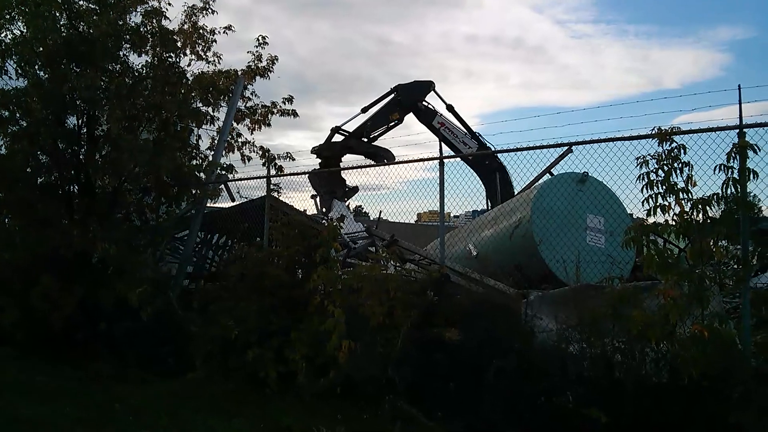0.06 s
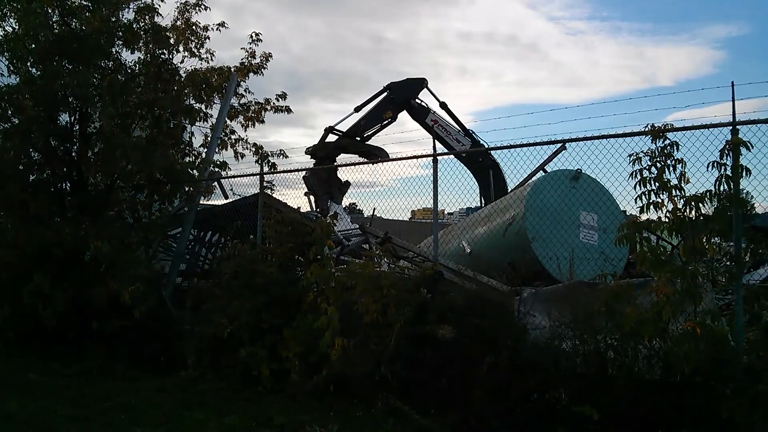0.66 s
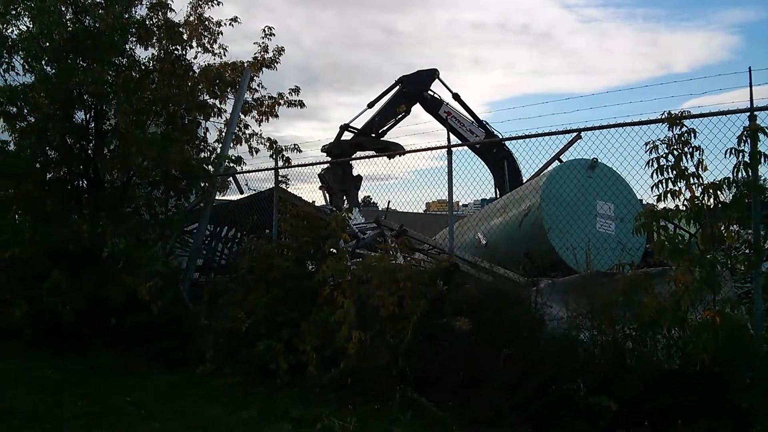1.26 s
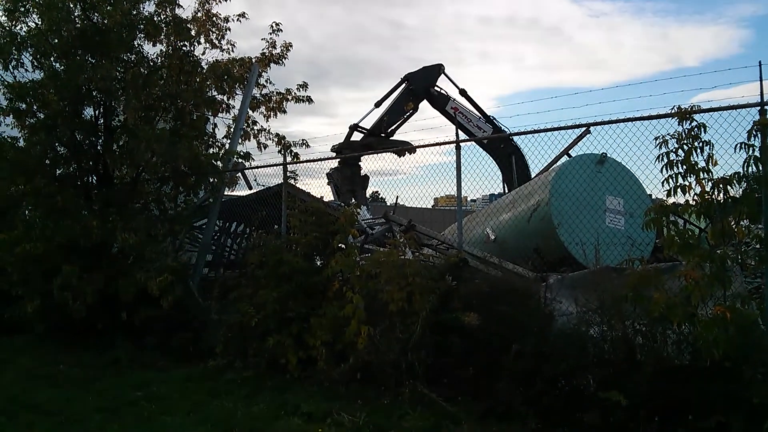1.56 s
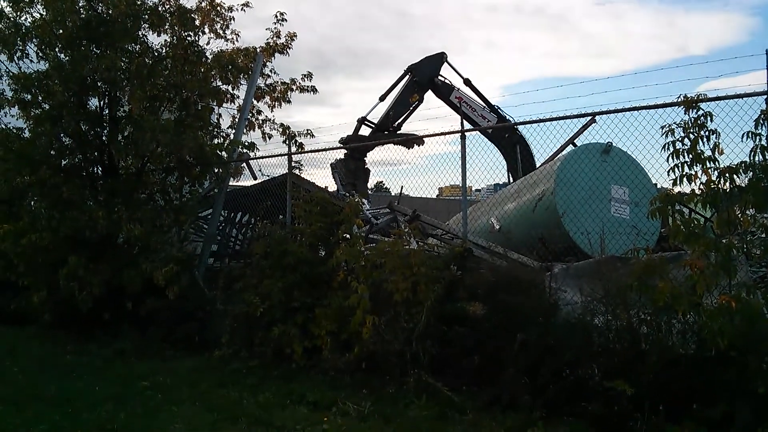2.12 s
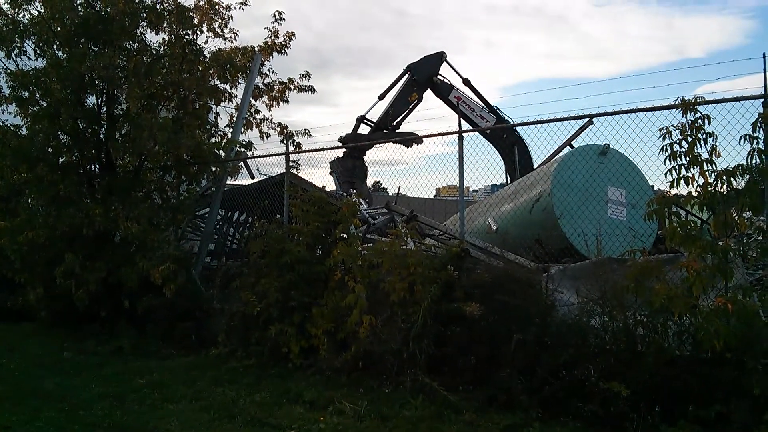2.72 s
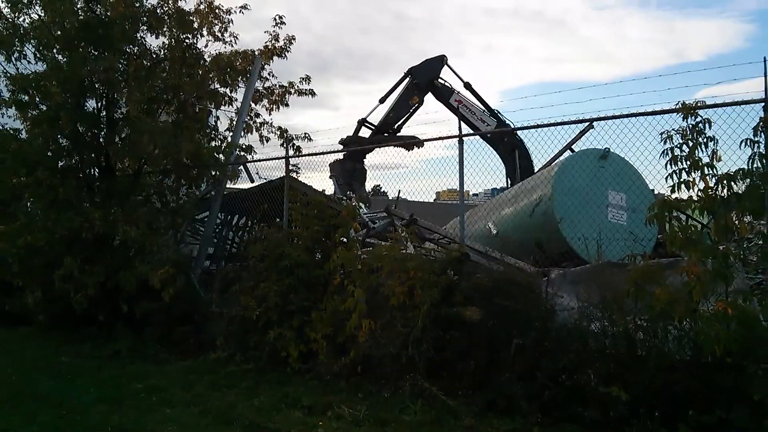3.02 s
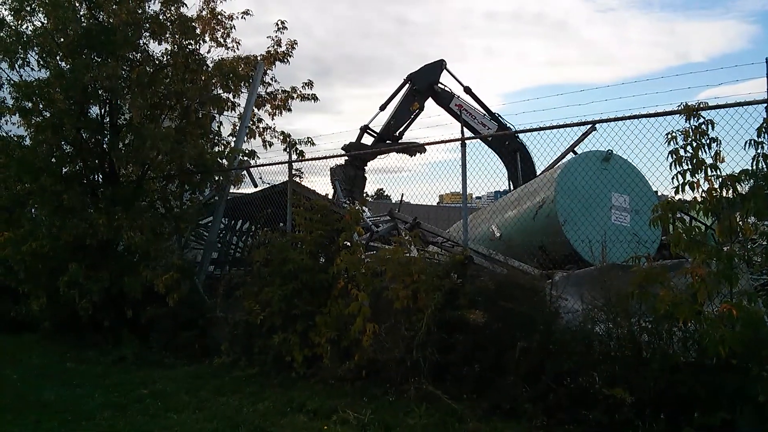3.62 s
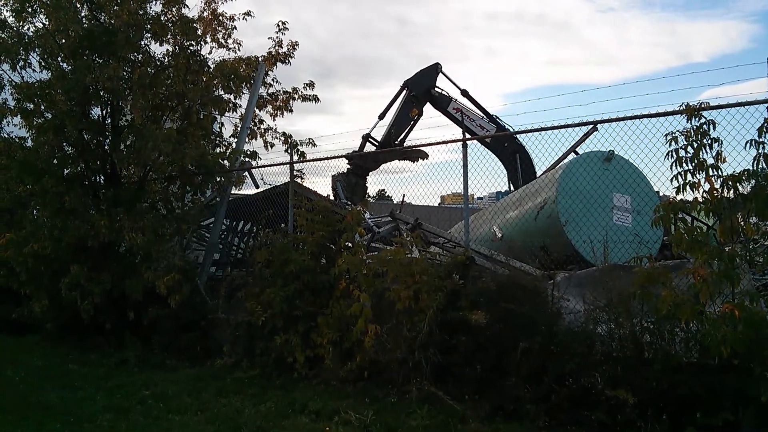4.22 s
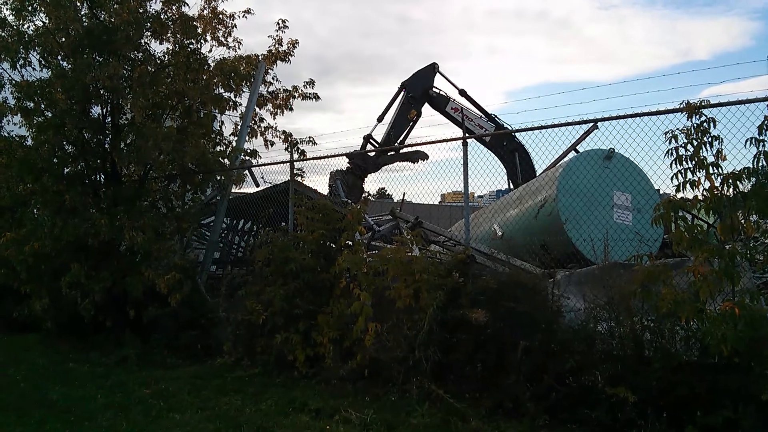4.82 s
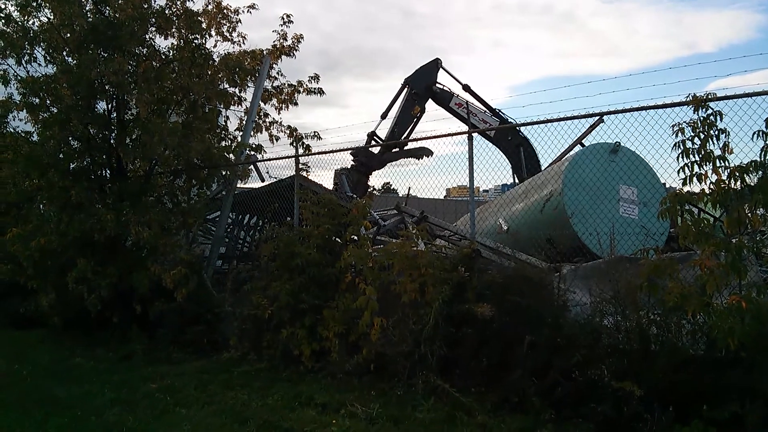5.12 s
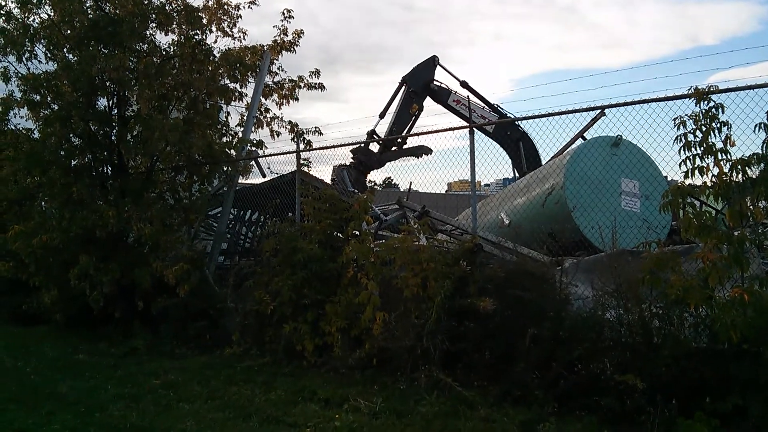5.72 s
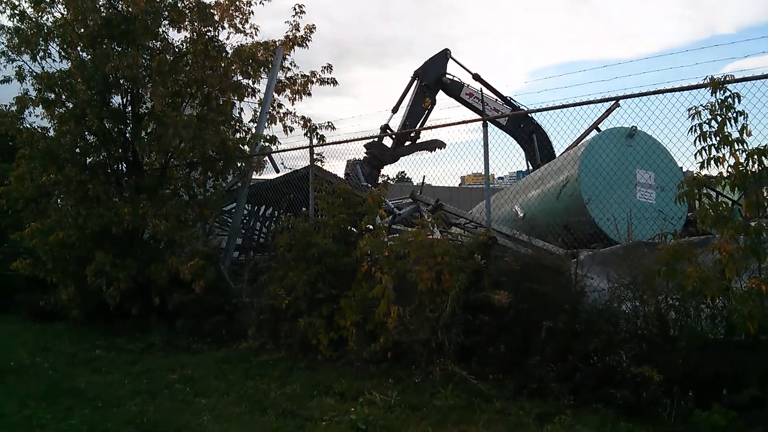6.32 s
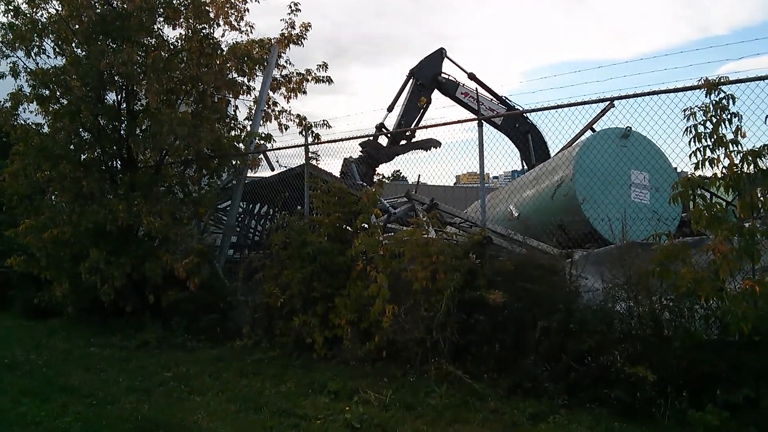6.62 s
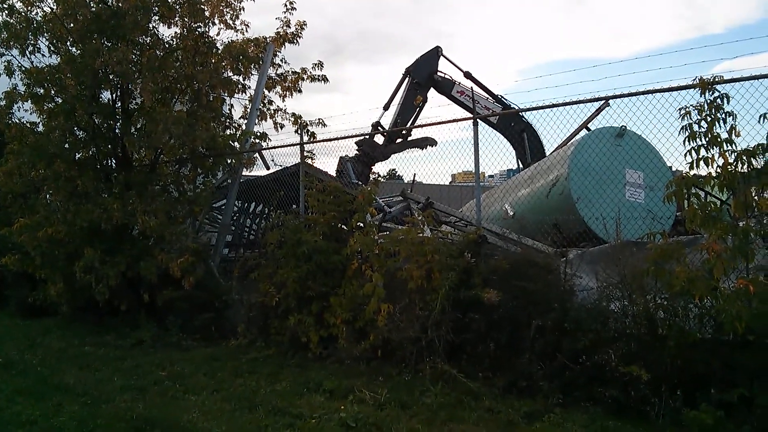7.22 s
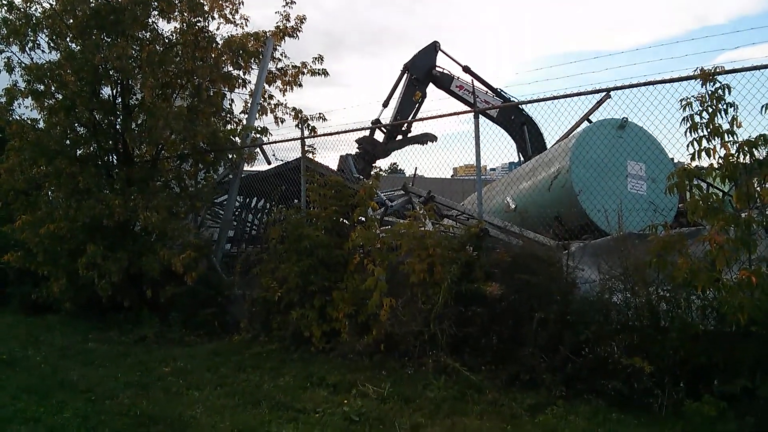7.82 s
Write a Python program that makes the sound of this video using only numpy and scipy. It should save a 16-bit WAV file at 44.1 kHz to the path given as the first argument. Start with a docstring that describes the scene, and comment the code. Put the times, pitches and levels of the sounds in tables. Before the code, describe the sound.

An excavator crushes sheet metal and steel framing outdoors, with crashes, low booms and short squeals over a faint diesel drone.

```python
"""Open yard, some way off: an excavator's jaws crush a heap of sheet metal and steel framing.
The diesel drones underneath with a thin turbo whistle. Panels rumble and boom, sheets crumple and tear,
beams give way in crashes, debris slides. Steel squeals on steel by stick-slip; a loose bar, a torn plate
and a sprung beam ring in their modes. The loudest crashes run into a limiter."""
import sys
import numpy as np
from scipy import signal
from scipy.fft import rfft, irfft
from scipy.io import wavfile
from scipy.ndimage import uniform_filter1d, minimum_filter1d

SR = 44100
rng = np.random.default_rng(int(sys.argv[2]) if len(sys.argv) > 2 else 0)


def store_wav(level_fs):
    """Save 16-bit WAV to argv[1]."""
    pcm = np.round(np.clip(np.atleast_2d(level_fs), -1, 1) * 32767)
    wavfile.write(sys.argv[1], SR, pcm.T.astype(np.int16))


N = 355446
TIME = np.arange(N) / SR


def from_db(db):
    """Decibels to gain."""
    return 10 ** (np.asarray(db) / 20)


def rms_one(x):
    """Scale to rms 1."""
    return x / np.sqrt(np.mean(x ** 2) + 1e-20)


def fade(t, t60_s):
    """1 until t = 0, then 60 dB down per t60_s."""
    return np.exp(-np.log(1000) * np.maximum(t, 0) / t60_s)


def through(x, response):
    """Convolve; keep the input length."""
    return signal.oaconvolve(x, response)[:len(x)]


def drift(rate_hz, size):
    """Smooth random motion, spread about 1."""
    knots = np.arange(size) * rate_hz / SR
    return np.interp(knots, np.arange(size), rng.standard_normal(size))


def colour(x, spectrum, size=8192):
    """Minimum-phase filter from (f/Hz, level/dB) points, steep fall above the last; output rms 1."""
    hz, db = np.transpose(spectrum)
    grid_hz = np.maximum(np.arange(size // 2 + 1) * SR / size, 1)
    gain = from_db(np.interp(np.log(grid_hz), np.log(hz), db)) / np.maximum(grid_hz / hz[-1], 1) ** 2
    cepstrum = irfft(np.log(gain))
    cepstrum[1:size // 2] *= 2
    cepstrum[size // 2 + 1:] = 0
    return rms_one(through(x, irfft(np.exp(rfft(cepstrum)))))


def steady(x, window_s):
    """Hold a texture's running rms at 1; keep its grain."""
    return x / np.sqrt(np.maximum(uniform_filter1d(x ** 2, int(window_s * SR) + 1), 1e-6))


def swell(start_s, db, rise_s, hold_s, t60_s):
    """Power envelope of one event: rise, hold until hold_s after the start, decay."""
    power, at = np.zeros(N), max(int(start_s * SR), 0)
    t = TIME[at:at + int((hold_s + 1.5 * t60_s) * SR)] - start_s
    attack = np.sin(np.pi / 2 * np.minimum(t / rise_s, 1)) ** 2
    power[at:at + len(t)] = (from_db(db) * attack * fade(t - max(hold_s, rise_s), t60_s)) ** 2
    return power


def yard(x, wet_db, t60_s, build_s=0.0079):
    """Direct sound plus scatter from heap, tank and walls."""
    t = TIME[:SR]
    scatter = rng.standard_normal(SR) * fade(t, t60_s) * (1 - np.exp(-t / build_s))
    response = from_db(wet_db) * rms_one(scatter) / np.sqrt(SR)
    response[0] = 1
    return through(x, response) / np.sqrt(1 + from_db(2 * wet_db))


def engine(whistle_db=-65, hiss_db=-66.5, drone_db=-42, waver=0.0043):
    """Distant diesel drone; turbo whistle and intake hiss grow with turbo speed."""
    # turbo whistle, following the load: t/s, f/Hz
    turbo = [(0, 10700), (1, 11000), (1.5, 11250), (2.4, 11300), (3.2, 11480), (3.85, 11700), (4.3, 11450),
             (4.85, 11620), (5.05, 11500), (5.4, 10700), (6.3, 10400), (6.62, 9620), (7.15, 10230),
             (7.6, 10330), (7.95, 11000), (8.06, 11050)]
    # spectrum of air rushing into the turbo: f/Hz, relative level/dB
    intake_spectrum = [(2000, -28), (4500, -14), (8000, -16), (11500, 21), (15000, -11)]
    # spectrum of diesel and open air: f/Hz, relative level/dB
    drone_spectrum = [(20, -21), (85, -9), (180, -13.5), (400, -15.5), (800, -20.5), (1600, -26),
                      (2200, -37), (3000, -46), (4800, -44.5), (7000, -51), (15000, -59)]
    hz = np.interp(TIME, *np.transpose(turbo))
    speed = hz / hz.max()
    phase = 2 * np.pi * np.cumsum(hz * (1 + waver * drift(500, N))) / SR
    whistle = from_db(whistle_db) * speed ** 12 * np.sin(phase)
    hiss = from_db(hiss_db) * speed ** 14 * colour(rng.standard_normal(N), intake_spectrum)
    drone = from_db(drone_db) * colour(rng.standard_normal(N), drone_spectrum)
    return whistle + hiss + drone


def strain(bite_rise_s=0.018):
    """Gains of rumble, crumple, tear and grit; bites, crashes, slides and cracks add in power."""
    # jaws close and press, heap settles: t/s, hold/s, rumble/dB, crumple/dB, tear/dB, crumple t60/s
    bites = [(-0.03, 0.47, -20, -20, -22.5, 0.94), (0.256, 0.7, -20.5, -17, -22, 0.98),
             (1.234, 0.6, -29.5, -31.5, -48.5, 1.2), (2.007, 0.67, -25, -37, -52, 1.0),
             (2.489, 0.13, -20.5, -18.5, -30.5, 1.65), (2.995, 0.21, -29.5, -34, -45.5, 3.8),
             (4.163, 0.21, -17.5, -20.5, -36, 3), (4.475, 0.69, -22.5, -21.5, -38, 1.7),
             (5.333, 0.62, -16, -18, -29, 3.43), (6.913, 0.15, -42, -43, -75, 2.0)]
    # something gives way: t/s, crumple/dB, tear/dB, grit/dB, crumple and tear t60/s
    crashes = [ (0.237, -7, -10, -24, 1), (0.356, -12.5, -11, -26, 0.72), (0.733, -12, -15.5, -36, 0.26),
               (0.859, -11, -18.5, -31, 0.57), (1.577, -23, -32, -40, 0.38), (2.090, -29, -35, -40, 0.67),
               (2.230, -12.5, -13.5, -29, 0.59), (3.128, -23.5, -37, -41, 0.13),
               (3.616, -43, -53, -70, 0.15), (4.114, -28.5, -41.5, -51, 1), (4.192, -4.5, -10, -23, 0.8),
               (4.419, -5.5, -6, -9, 0.32), (4.864, -12, -24, -55, 0.69), (5.091, -22.5, -28.5, -60, 0.62),
               (5.323, -13, -17.5, -25, 0.38), (5.511, -11.5, -7.5, -20, 0.2), (5.587, -20, -16, -42, 0.35),
               (5.985, -19, -16.5, -41, 0.23), (6.163, -15.5, -43, -50, 0.25),
               (6.583, -36, -55, -52, 0.099), (6.645, -33, -34, -58, 0.8), (7.002, -29.5, -64, -68, 0.27),
               (7.207, -34, -49, -72, 0.33), (7.463, -31.5, -41, -53, 0.54),
               (8.021, -34.5, -52.5, -69, 0.57)]
    # small debris slides down the heap: t/s, length/s, level/dB
    slides = [(-0.03, 0.43, -33), (0.504, 0.62, -39.5), (1.194, 0.3, -36.5), (1.649, 0.14, -38.5),
              (1.945, 0.17, -39), (2.28, 0.078, -32.5), (2.487, 0.14, -41), (3.034, 0.096, -43),
              (3.232, 0.062, -39), (4.489, 0.069, -30.5), (4.87, 0.078, -43.5), (5.238, 0.069, -47),
              (5.54, 0.033, -46), (5.755, 0.35, -45.5), (6.28, 0.16, -43)]
    # a brittle piece snaps: t/s, level/dB, t60/s
    cracks = [(1.581, -28.5, 0.18), (2.849, -30.5, 0.018), (3.448, -42, 0.31), (4.879, -26, 0.0033),
              (5.524, -5.5, 0.076), (6.531, -46, 0.036), (6.802, -39, 0.16)]
    rumble, crumple, tear = np.zeros((3, N))
    for start_s, hold_s, rumble_db, crumple_db, tear_db, t60_s in bites:
        rumble += swell(start_s, rumble_db, bite_rise_s, hold_s, 1.1 * t60_s)
        crumple += swell(start_s, crumple_db, bite_rise_s, hold_s, t60_s)
        tear += swell(start_s, tear_db, bite_rise_s, hold_s, 0.58 * t60_s)
    grit = tear * from_db(-19.5) ** 2   # tearing sheds a little grit
    for start_s, crumple_db, tear_db, grit_db, t60_s in crashes:
        rise_s = 0.007 * t60_s   # long collapses swell more slowly
        crumple += swell(start_s, crumple_db, rise_s, 0, t60_s)
        tear += swell(start_s, tear_db, rise_s, 0, t60_s)
        grit += swell(start_s, grit_db, 3.16 * rise_s, 0, 0.5 * t60_s)   # comes loose later, dies sooner
    for start_s, length_s, db in slides:
        grit += swell(start_s, db, rise_s=0.029, hold_s=length_s, t60_s=0.56)
    for start_s, db, t60_s in cracks:
        grit += swell(start_s, db, rise_s=0.00095, hold_s=0, t60_s=t60_s)
    return np.sqrt([rumble, crumple, tear, grit])


def scrap(low_hz, high_hz, per_s, spread_db, t60_s, ring_db, pieces=10, modes=14):
    """Random snaps dealt to metal pieces; each is a noise crack plus that piece's modes."""
    t, out = TIME[:SR // 3], np.zeros(N)
    fires = rng.random(N) < per_s / SR
    strength = from_db(spread_db * np.minimum(rng.exponential(1, N), 4))
    snaps = fires * strength * rng.choice([-1, 1], N)
    owner = rng.integers(0, pieces, N)
    ring_gain = from_db(ring_db) * np.sqrt(2 * (high_hz - low_hz) / SR)   # re the crack's in-band part
    for piece in range(pieces):
        hz = rng.uniform(low_hz, high_hz, (modes, 1))
        ring = (rng.standard_normal((modes, 1)) * np.sin(2 * np.pi * hz * t)).sum(0) * fade(t, t60_s)
        crack = rng.standard_normal(len(t)) * fade(t, 0.014)
        out += through(snaps * (owner == piece), rms_one(crack) + ring_gain * rms_one(ring))
    return out


def heap():
    """Under the jaws, panels rumble, sheets crumple, edges tear, debris slides and clinks."""
    # spectra of panels, sheets, edges and debris: f/Hz, relative level/dB
    rumble_spectrum = [(15, -47), (30, -22), (48, -4.5), (68, -2), (85, 5), (105, -2), (155, -1.5),
                       (195, -16), (300, -49.5)]
    crumple_spectrum = [(120, -10), (190, -5), (235, 0.5), (320, 1.5), (470, 0), (610, -4.5), (750, -2),
                        (900, -8.5), (1200, -12), (2000, -22), (3000, -59)]
    tear_spectrum = [(500, -27), (950, 3.5), (1350, 1), (1800, 0.5), (2100, -3.5), (2400, -8.5),
                     (2900, -11), (3600, -13), (5000, -16.5), (12000, -39)]
    grit_spectrum = [(1800, 6), (3000, -4), (4000, -0.5), (4700, -1), (5600, 4), (6300, 2.5), (7100, 5.5),
                     (9000, 1.5), (10500, -4.5), (13000, -2.5), (16000, -24)]
    rumble, crumple, tear, grit = strain()
    panels = scrap(44.7, 199.8, per_s=150, spread_db=2.5, t60_s=0.18, ring_db=6)
    sheets = scrap(201.7, 997.6, per_s=300, spread_db=2, t60_s=0.13, ring_db=-0.5, pieces=20, modes=6)
    edges = scrap(909, 2600, per_s=400, spread_db=2, t60_s=0.066, ring_db=-6, modes=24)
    slide = scrap(3500, 11000, per_s=1400, spread_db=-5.5, t60_s=0.56, ring_db=2, modes=40)
    clinks = scrap(3800, 11000, per_s=70, spread_db=3, t60_s=0.09, ring_db=10, pieces=36, modes=4)
    sheets = yard(sheets, wet_db=-4, t60_s=0.97)
    edges = yard(edges, wet_db=-0.5, t60_s=0.59)
    debris = yard(rms_one(slide) + from_db(-5) * rms_one(clinks), wet_db=-2, t60_s=0.3)
    out = from_db(-1.5) * rumble * steady(colour(panels, rumble_spectrum), window_s=0.079)
    out += crumple * steady(colour(sheets, crumple_spectrum), window_s=0.18)
    out += tear * steady(colour(edges, tear_spectrum), window_s=0.21)
    return out + grit * steady(colour(debris, grit_spectrum), window_s=0.1)


def booms(rise_s=0.0075, highpass_hz=55):
    """A buckling panel swings briefly; its boom carries little below its own pitch."""
    # a large panel buckles: t/s, level/dB, f/Hz, t60/s
    buckles = [(0.0, 4, 90, 0.096), (1.37, -16, 88, 0.1), (1.665, -14.5, 87, 0.57), (1.998, -7.5, 83, 0.13),
               (2.491, 1, 101, 0.1), (2.561, -3, 106, 0.15), (3.58, -27.5, 94, 0.4), (3.82, -29, 90, 0.53),
               (4.52, -4, 101, 0.1), (5.491, 10.5, 95, 0.16), (5.548, 1.5, 122, 0.15),
               (6.388, -7, 82.7, 0.31), (6.668, -12.5, 84.4, 0.27), (7.122, -23, 88, 0.37),
               (7.317, -17.5, 84.5, 0.26)]
    out = np.zeros(N)
    for start_s, db, hz, t60_s in buckles:
        at = int(start_s * SR)
        t = TIME[:min(SR, N - at)]
        envelope = fade(t, t60_s) * (1 - np.exp(-t / rise_s))
        out[at:at + len(t)] += from_db(db) * envelope * np.sin(2 * np.pi * hz * t)
    highpass = signal.butter(2, highpass_hz, "high", fs=SR, output="sos")
    return signal.sosfilt(highpass, yard(out, wet_db=-8.5, t60_s=0.53))


def squeals(wobble_hz=750, rasp_hz=273.6, rasp_db=3, db_per_partial=15, rise_s=0.0045, t60_s=0.15):
    """Steel sticks and slips on steel: groans to squeals, unsteady in pitch, rasping in level."""
    # slips: t/s, length/s, f/Hz, glide/(oct/s), level/dB, relative wobble, spectral peak/partial no.
    slips = [ (0.06, 0.079, 4640, -0.35, -32.5, 0.0076, 0.8), (0.729, 0.033, 3300, 0.057, -34, 0.009, 2.05),
             (0.787, 0.11, 4300, 0, -37, 0.012, 0.8), (0.810, 0.11, 464.3, -0.74, -15.5, 0.066, 0.95),
             (1.218, 0.063, 3457, 0.5, -13.5, 0.032, 1.35), (1.360, 0.1, 2840, -0.26, -28, 0.015, 2.35),
             (1.347, 0.086, 2240, 0.21, -28, 0.039, 3.3), (1.353, 0.032, 2560, 0.15, -32.5, 0.021, 0.8),
             (1.581, 0.072, 1526, -0.36, -24, 0.086, 0.8), (1.586, 0.024, 2084, 0.22, -30, 0.025, 0.8),
             (1.574, 0.01, 2630, -0.7, -22.5, 0.026, 0.8), (1.727, 0.061, 2556, -0.41, -14, 0.019, 1.6),
             (2.226, 0.12, 740, -0.19, -1.5, 0.1, 1.25), (2.23, 0.047, 1383, -0.032, -6, 0.045, 1.15),
             (2.227, 0.085, 2006, 0.059, -17, 0.049, 0.8), (2.229, 0.027, 1695, -0.45, -17, 0.034, 2.0),
             (3.045, 0.15, 772, -0.18, -34.5, 0.063, 1.05), (3.624, 0.08, 742, 0.3, -37.5, 0.1, 0.9),
             (4.192, 0.15, 741, 0.07, -11.5, 0.1, 1.05), (4.930, 0.45, 503, 0.017, -27, 0.087, 1.1),
             (5.323, 0.02, 1790, 0, -15, 0.056, 0.95), (5.52, 0.0041, 2650, -0.36, -14.5, 0.13, 2.05),
             (6.269, 0.065, 2206, -0.15, -37, 0.015, 2.05), (6.387, 0.03, 2240, -0.19, -31.5, 0.038, 2.4),
             (6.328, 0.24, 313.7, 0.32, -25, 0.11, 0.9), (7.129, 0.21, 521, 0.86, -37.5, 0.05, 0.9),
             (7.485, 0.025, 410, -0.069, -29.5, 0.1, 0.9)]
    out = np.zeros(N)
    for start_s, length_s, hz, glide_oct_per_s, db, wobble, peak in slips:
        at = int(start_s * SR)
        t = TIME[:min(SR // 2, N - at)]
        jitter = wobble * drift(min(wobble_hz, hz / 2), len(t))   # slip period varies
        pitch_hz = hz * 2 ** (glide_oct_per_s * np.minimum(t, length_s)) * (1 + jitter)
        phase = 2 * np.pi * np.cumsum(pitch_hz) / SR
        tone = sum(from_db(db - db_per_partial * abs(k - peak)) * np.sin(k * phase) for k in range(1, 5))
        rasp = rms_one(from_db(rasp_db * drift(rasp_hz, len(t))))
        envelope = np.minimum(t / rise_s, 1) * fade(t - length_s, t60_s)
        out[at:at + len(t)] += np.sqrt(2) * tone * rasp * envelope
    return yard(out, wet_db=-3, t60_s=0.42)


def struck(hits, modes, rise_s=0.0034, chatter_db=2, jitter_rad=0.5):
    """Each knock rings all modes of a steel piece; chatter against the heap roughens them."""
    t, out = TIME[:SR // 2], np.zeros(N + SR)
    for start_s, hit_db in hits:
        at = int(start_s * SR)
        for hz, mode_db, t60_s in modes:
            chatter = rms_one(from_db(chatter_db * drift(250, len(t))))
            phase = 2 * np.pi * hz * t + jitter_rad * drift(200, len(t))
            envelope = fade(t, t60_s) * np.minimum(t / rise_s, 1)
            out[at:at + len(t)] += from_db(hit_db + mode_db) * chatter * np.sin(phase) * envelope
    return yard(out[:N], wet_db=-4, t60_s=0.35)


def bar():
    """A loose bar pings when knocked."""
    # knocks: t/s, level/dB
    hits = [(0.405, -22), (2.442, -34), (2.849, -31.5), (3.394, -37.5), (3.80, -55.5), (5.595, -26)]
    # bar modes: f/Hz, level/dB, t60/s
    modes = [(3750, -1, 0.076), (4020, 4, 0.17), (4540, -15, 0.26), (6840, -14, 0.14), (7770, -9, 0.2),
             (9200, -10, 0.19)]
    return struck(hits, modes)


def plate():
    """A torn plate clacks against the heap."""
    # clacks: t/s, level/dB
    hits = [(3.16, -38), (3.262, -32), (5.472, -36), (6.532, -41), (6.652, -42), (6.803, -44), (7.21, -53),
            (7.465, -36), (7.815, -49)]
    # plate modes: f/Hz, level/dB, t60/s
    modes = [(3450, -3, 0.16), (4100, -12, 0.18), (4540, -25, 0.26), (4720, 4.5, 0.039),
             (4920, -4.5, 0.142), (5430, -23, 0.23), (5610, -17.5, 0.23)]
    return struck(hits, modes)


def beam():
    """A beam springs free, rebounds and rings."""
    # release and rebound: t/s, level/dB
    hits = [(4.428, -6.5), (4.476, -14)]
    # beam modes: f/Hz, level/dB, t60/s
    modes = [(1680, -12, 0.7), (1810, -19, 0.67), (4580, -4, 0.13), (4580, 7, 0.044), (6800, -16, 0.34),
             (7630, -20.5, 0.44), (7700, -27, .4), (10950, -29.5, .3)]
    return struck(hits, modes)


def scene():
    """All sources, mono, from one spot behind the fence."""
    steel = bar() + beam() + plate()
    return (heap() + booms() + squeals() + steel + engine())[None]


def limiter(x, ceiling=0.69, release_db_per_s=500, window_samples=45):
    """Gain ducks just ahead of each peak over the ceiling, then recovers quickly."""
    over_db = np.maximum(20 * np.log10(np.abs(x) / ceiling + 1e-9), 0)
    release_db = release_db_per_s * TIME
    held_db = np.maximum.accumulate(over_db + release_db, axis=-1) - release_db
    gain_db = uniform_filter1d(minimum_filter1d(-held_db, window_samples), window_samples)
    return x * from_db(gain_db)


def record(dry, cutoff_hz=15500):
    """Recorder notches, limiter, steep low-pass."""
    # static narrow notches in the recorder's sound, 2.5-4.1 kHz: f/Hz, width/Hz, depth (0-1)
    recorder_notches = [(2525, 150, 0.5), (2815, 326, 1), (3142, 346, 1), (3454, 260, 0.96),
                        (3770, 190, 0.91), (4115, 120, 0.97)]
    for hz, width_hz, depth in recorder_notches:
        band = signal.lfilter(*signal.iirpeak(hz, hz / width_hz, fs=SR), dry)
        dry = dry - depth * band
    lowpass = signal.ellip(10, 0.1, 90, cutoff_hz, fs=SR, output="sos")
    return signal.sosfilt(lowpass, limiter(dry))


dry = scene()
out = record(dry)
store_wav(out)
```